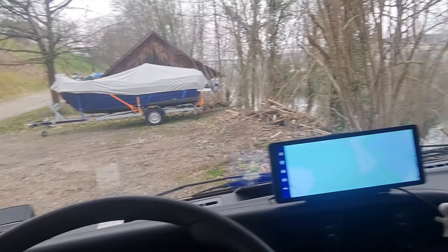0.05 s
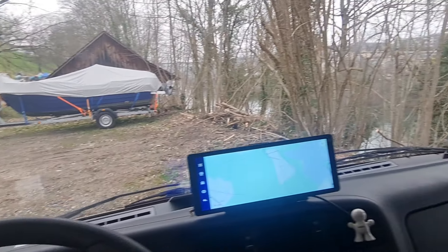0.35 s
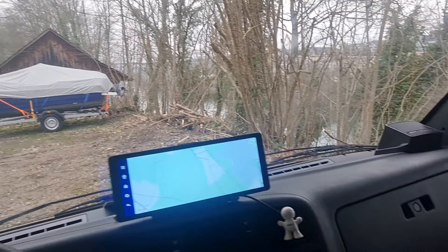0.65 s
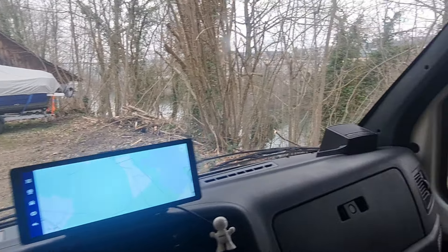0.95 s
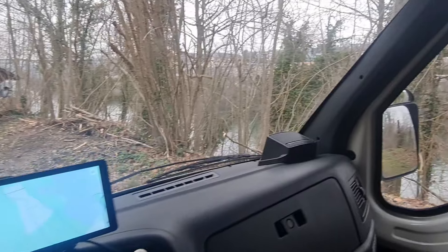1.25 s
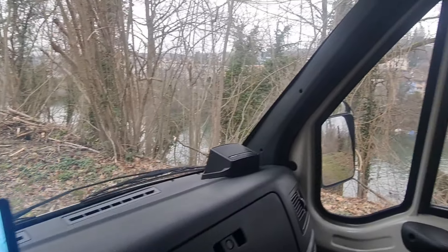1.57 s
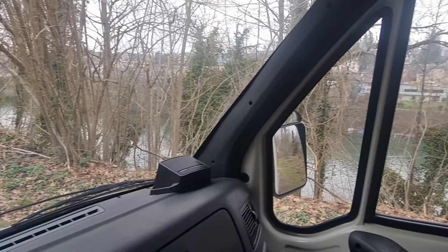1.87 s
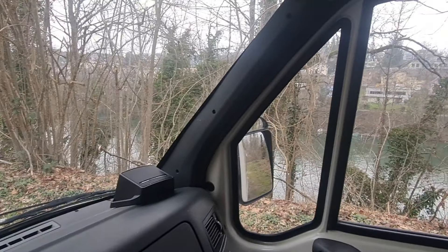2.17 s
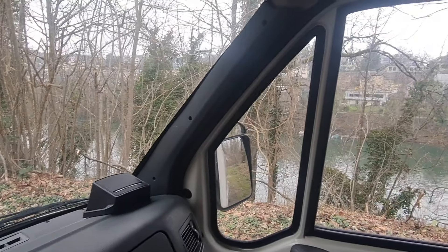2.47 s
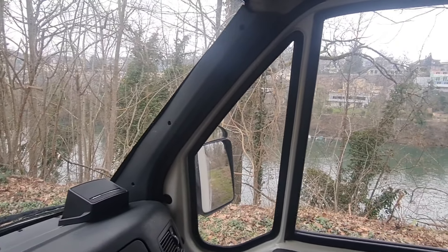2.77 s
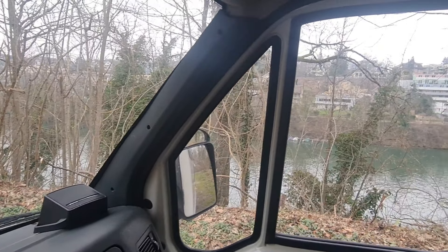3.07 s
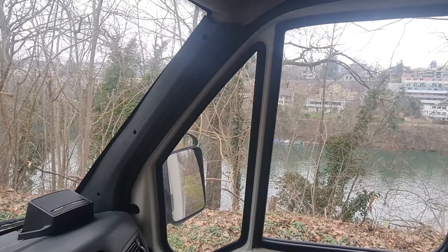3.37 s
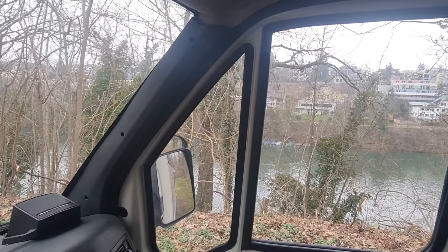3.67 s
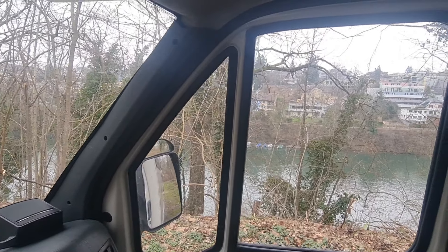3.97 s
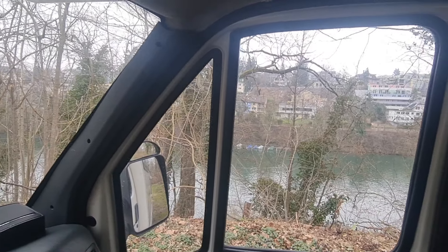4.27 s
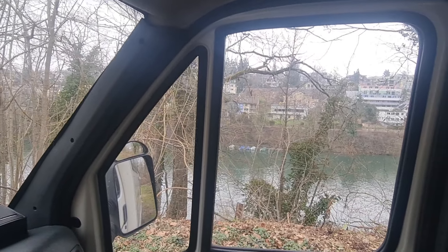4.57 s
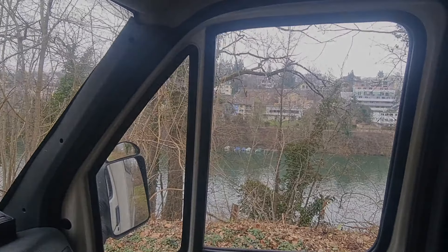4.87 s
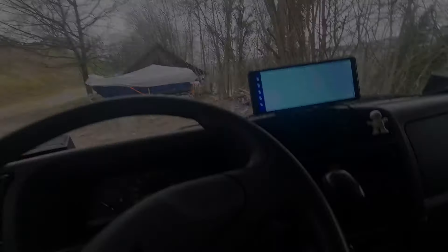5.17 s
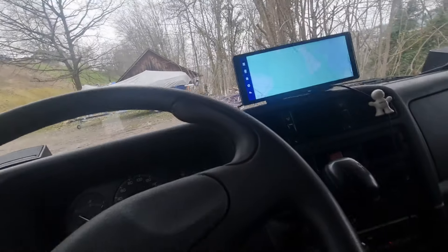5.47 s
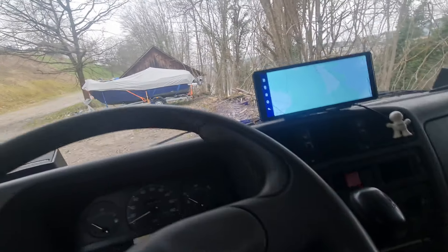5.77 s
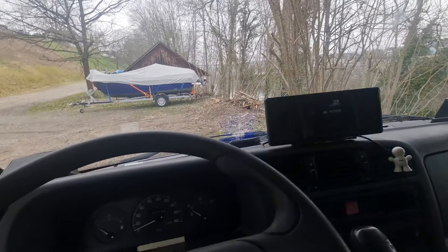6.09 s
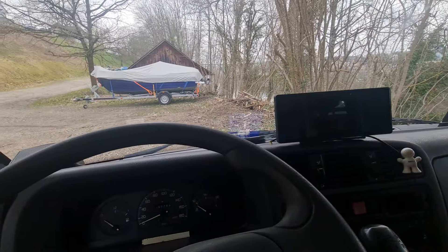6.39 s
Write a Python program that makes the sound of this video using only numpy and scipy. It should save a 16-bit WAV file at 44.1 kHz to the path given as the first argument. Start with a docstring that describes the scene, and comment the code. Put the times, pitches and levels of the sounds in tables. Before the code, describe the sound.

From the driver's seat of a parked van, a diesel engine idles steadily, making the cab boom, knock and rattle. A faint whine and tiny belt chirps run through it, with brief seat creaks and a plastic tick early on. The idle fades out without slowing. In the now quiet cab, a sleeve rustles, the body rumbles softly and keys click, ending with a short scrape and knock in the ignition lock.

```python
"""Idling camper van, then keys

From the driver's seat, a four-cylinder diesel makes the cab boom, knock and rattle with each firing.
Gears whine, a slipping belt chirps, the seat creaks, plastic ticks and a finger brushes the microphone.
The idle fades out at the same speed and the quiet cab fades in: a sleeve rustles, the body rumbles,
keys tick together, and the key scrapes and snaps in the ignition lock, knocking the steering column."""
import sys
import numpy as np
from scipy import signal
from scipy.fft import rfft, irfft, next_fast_len
from scipy.io import wavfile
from scipy.ndimage import uniform_filter1d, map_coordinates

SR = 44100
rng = np.random.default_rng(int(sys.argv[2]) if len(sys.argv) > 2 else 0)


def generate_wav(sig):
    """Save sig (samples, or channels by samples) to the path in sys.argv[1] as 16-bit PCM at SR."""
    pcm = np.round(np.clip(np.atleast_2d(sig).T, -1, 1) * 32767).astype(np.int16)
    wavfile.write(sys.argv[1], SR, pcm)


N = 283563
T = np.arange(N) / SR

FIRING_HZ = 24.62   # a "beat" is the time between two firings; four beats make one engine cycle
TURN_S = 3.3   # the microphone swings from wheel to side window; each "early boost" is gone by then
SILENT_AT_S, FADE_OUT_S, FADE_IN_S = 5.109, 0.52, 0.35

# Tone, colour and ring levels are relative; timed events carry their own loudness.
# how alike the left and right sides are: (frequency [Hz], likeness [0 to 1])
STEREO_LIKENESS = [(60, 0.5), (150, 0.96), (300, 0.7), (600, 0.5), (1200, 0.17), (4000, 0.22), (12000, 0.5)]
# which side is louder: (frequency [Hz], left over right [dB])
STEREO_BALANCE = [(60, -0.5), (150, -1.0), (380, -0.5), (940, -1.5), (2370, -3.5), (5940, -5.0),
                  (14900, -3.5)]
# engine sound reaches the left side first: (frequency [Hz], head start [s])
ENGINE_LEAD = [(250, 0.00042), (550, 0.00027), (1100, 0.000445)]
# tones of the booming cab and its panels: (multiple of the firing rate, level [dB])
BOOM_TONES = [(1, -0.5), (2, -1.73), (3, -9.5), (4, -10.5), (5, -19), (6, -19), (7, -17), (8, -16.5),
              (9, -14), (10, -31), (11, -36), (12, -23), (13, -19), (14, -25.5)]
# ways from the engine into the cab: (highest multiple carried, delay [beats], level [dB],
# early boost [dB], level wobble [dB], phase wobble [rad])
BOOM_PATHS = [(1, 0.065, 0, -2.5, 1.3, .04), (2, 0.0088, 0, 0.5, 1, 0.044),
              (3, 0.0023, -0.5, 3.5, 1, 0.045), (4, 0.082, -1.34, -8, -0.1, 0.078),
              (7, 0.198, -2.5, -6, 3.5, 0.58), (9, -0.0127, -0.42, 0, 1.06, 0.31),
              (14, 0.486, -2, 1.5, 1, 0.096)]
# tone colour of the engine's rumble: (frequency [Hz], level [dB])
RUMBLE_COLOUR = [(20, -26), (40, 16), (80, 10), (115, 16.5), (160, 9.5), (210, 12), (270, 2), (400, -51)]
# ring of the bulkhead, the wall between engine and cab: (pitch [Hz], width [Hz], level [dB])
BULKHEAD_RING = [(290.5, 119, 0)]
# how hard each of the four cylinders thumps that wall: (level [dB])
CYLINDER_THUMPS = [-13.5, 0.5, -3, 0]
# knocks set off by each firing: (lowest frequency [Hz], highest frequency [Hz], start [beats],
# decay [beats], height over the steady din [ratio], share that repeats each cycle [0 to 1], level [dB])
KNOCK_BANDS = [(214.3, 404, 0.52, 0.16, 0.33, 0.55, -3.5), (454, 1185, 0.58, 0.23, 0.51, 0.5, 2),
               (1005, 2340, .53, 0.75, 1.8, 0.5, 0)]
# how hard each cylinder knocks: (level [dB])
CYLINDER_KNOCKS = [-0.5, -1, -1, -1.5]
# clack of each cylinder's fuel injector: (height over the steady din [ratio])
INJECTOR_CLACKS = [0.25, 0.1, 1.1, 1.4]
# tone colour of the clatter that reaches the cab: (frequency [Hz], level [dB])
CLATTER_COLOUR = [(140, -40), (240, -0.5), (263, -0.5), (327, -2), (400, -7), (475, -18), (540, -16),
                  (719, -17.5), (886, -22.5), (1060, -23.5), (1220, -28), (1580, -26.5), (1710, -31),
                  (2600, -41.5), (3380, -67), (5720, -120)]
# gears and alternator: (pitch [Hz], level [dB], early boost [dB], phase wobble [rad], level wobble [dB])
WHINE_TONES = [(592, -22, -4, 0.65, 3.5), (648, -22, -8, 0.7, 2), (716, -26.5, 7, 0.7, 2.5),
               (744, -22.5, 2, 0.7, 4.5), (828, -33, 6, 1.2, 4), (1036, -28, 0, 0.31, 0.5),
               (1334, -30.5, 3, 1.6, 2), (1597, -29.5, -4.5, 1.1, 1.5)]
# valve gear and loose trim rattling through one cycle:
# (start [beats], hold [beats], level [dB], bright edge [dB], early boost [dB])
RATTLE_PATTERN = [(0.04, 0.13, -3.5, -2.5, 0), (0.54, .22, 1, -4, -6), (0.751, .04, -7, 2.5, -5.5),
                  (1.06, .28, 1.5, 3, -2), (1.38, .36, 0.5, -1.5, -3), (1.76, 0.15, 1, 6, -5.5),
                  (2.05, .32, 3, 2, -2.5), (2.41, 0.32, 1, -2.5, -5), (2.78, 0.15, -2, 2.5, -2),
                  (2.96, 0.4, -2.5, -13, -4.5), (3.34, .25, -1.5, -6.5, -3.5), (3.63, 0.41, -1, -4.5, -2)]
# ring of the loose trim: (pitch [Hz], width [Hz], level [dB])
TRIM_RING = [(2950, 250, -1.5), (3630, 150, -2), (3893, 150, 0)]
# tone colour of the rattle: (frequency [Hz], level [dB])
RATTLE_COLOUR = [(1180, -31), (2000, 5), (2100, 2.5), (2640, -5.5), (3670, -5), (4530, -9), (5270, -8),
                 (5880, -15.5), (6680, -14.5), (8380, -21.5), (9050, -39), (10000, -42), (14300, -40.5),
                 (15000, -32.5)]
# slips of the belt: (time [s], level [dB], pitch [Hz])
BELT_CHIRPS = [(.047, -64, 5260), (.2, -68, 5220), (.233, -79, 5570), (0.409, -68, 5280),
               (0.488, -59, 5210), (.518, -64.5, 5180), (.641, -66, 5170), (.691, -61, 5170),
               (.804, -63.5, 5180), (.86, -66, 4950), (.97, -64, 5170), (1.009, -61, 5200),
               (1.13, -62, 5200), (1.182, -61.5, 5320), (1.35, -63, 5300), (1.46, -61, 5050),
               (1.505, -61.5, 5270), (1.622, -61.5, 5170), (1.651, -63, 5300), (1.828, -63, 5340),
               (1.984, -64, 5140), (2.15, -64, 5390), (2.319, -63, 5420), (2.483, -60.5, 5380),
               (2.52, -65, 5120), (2.636, -63.5, 5330), (2.676, -63, 5180), (2.756, -65, 5140),
               (2.8, -65, 5300), (3.29, -65, 5280), (3.459, -60, 5260), (3.813, -65, 5140),
               (3.899, -64, 5220), (4.595, -69, 5300)]
# creaks of the seat: (time [s], level [dB], half length [s], pitch [Hz], rise [Hz/s])
SEAT_CREAKS = [(0.425, -46.5, .014, 485, 500), (0.533, -49.5, 0.017, 620, 6070)]
# plastic ticking in the cab: (time [s], level [dB], left over right [dB], snap over crackle [dB],
# crackle decay [s], bright edge [dB], highest treble over edge [dB])
PLASTIC_TICKS = [(1.087, -29, -9, 16.5, .0004, -1.5, -13), (1.0933, -26, 2, 9, 0.001, -22, -14),
                 (3.58, -41.5, -5.5, 9, 0.0013, 10, -27), (4.351, -39, -3, 2, 0.017, 3.5, -34.5)]
# thin high hiss of a finger brushing the microphone, later the top of the sleeve's rustle:
# (time [s], level [dB], half length [s])
HISS_SWELLS = [(1.147, -85, 0.068), (1.285, -83, 0.019), (1.465, -83, .02), (1.525, -77, 0.025),
               (5.45, -88.5, 0.18), (5.521, -76, .003)]
# tone colour of the van's body rocking: (frequency [Hz], level [dB])
ROCKING_COLOUR = [(15, -37.5), (25, -15), (38, -6.5), (52, -0.5), (64, -8), (80, -12.5), (113, -19),
                  (211, -28.5), (245, -27.5), (280, -23.5), (354, -41), (700, -48), (910, -76),
                  (1540, -120)]
# tone colour of the sleeve and the cab's still air: (frequency [Hz], level [dB])
RUSTLE_COLOUR = [(150, -25), (250, -9), (364, -5.5), (448, -8.5), (513, -8.5), (620, -13), (1270, -14.5),
                 (1560, -19.5), (1890, -20), (2530, -22.5), (4200, -23), (6800, -27), (8500, -35.5),
                 (10500, -42), (15000, -35)]
# moves of the sleeve: (time [s], level [dB], half length [s])
SLEEVE_RUSTLES = [(5.46, -70, 0.15), (6.35, -68, 0.024)]
# bumps on the body and steering column: (time [s], level [dB], pitch [Hz], rise time [s], decay [s])
SOFT_BUMPS = [(5.488, -55, 198, .003, 0.025), (5.499, -41, 51.2, .012, 0.036),
              (5.502, -47.5, 270, .001, 0.0083), (5.517, -69, 400, .001, 0.011),
              (5.532, -58.5, 536, .001, 0.011), (5.635, -48, 53.6, .01, 0.034),
              (5.965, -59, 440, .002, 0.0094), (6.069, -58.5, 285, .002, .015),
              (6.139, -47.5, 50, .01, 0.037), (6.204, -43, 47.7, 0.0055, 0.023),
              (6.287, -52, 440, .012, .022), (6.32, -38, 440, 0.017, 0.019),
              (6.343, -46.5, 310, .002, 0.01), (6.362, -42.5, 55.3, .003, 0.019),
              (6.366, -36, 492, .006, 0.0075), (6.38, -47, 480, .002, 0.0072),
              (6.404, -61, 416, .002, 0.011)]
# clicks of keys and lock: (time [s], level [dB], left over right [dB], treble [dB])
KEY_CLICKS = [(5.519, -72, 3, -1), (5.943, -61.5, -2, -6.5), (5.959, -66, 2, -18), (6.044, -75, -3, 3),
              (6.069, -60.5, 3, -3.5), (6.239, -75, -2, -10), (6.3268, -50, -6, -8), (6.3323, -58, 0, -12),
              (6.351, -62, -3, -18), (6.381, -70, 2, -14)]
# ring of the keys and lock: (pitch [Hz], width [Hz], level [dB])
KEY_RING = [(1100, 130, -1), (1530, 120, -4), (1930, 79, -8), (2430, 140, -3), (3140, 320, -8),
            (4130, 230, 0.5), (5400, 500, -8), (6240, 240, 9), (6800, 610, 0), (8600, 420, -5),
            (12800, 540, -21)]
# the key squeaking on the face of the lock: (time [s], level [dB], pitch [Hz])
KEY_SQUEAKS = [(5.969, -75, 2514), (6.25, -78, 2280)]
# the key dragging through the lock: (time of full pressure [s], level [dB], rise time [s])
KEY_PUSHES = [(6.335, -50.5, 0.087), (6.429, -52, 0.0091)]
# ring of the steering column's cover: (pitch [Hz], width [Hz], level [dB])
COLUMN_RING = [(295, 97, -3.5), (450, 46, 6), (492, 45, 2.5), (660, 110, -12), (790, 120, -12),
               (1150, 82, -18.5), (1440, 120, -20.5), (1900, 410, -25.5), (2500, 310, -24.5),
               (3570, 1600, -38)]


def from_db(db):
    """Turn decibels into a number to multiply by."""
    return 10 ** (np.asarray(db) / 20)


def rms_one(x):
    """Scale a sound so that its average strength (rms) is 1."""
    return x / np.sqrt(np.mean(x ** 2) + 1e-30)


def at_hz(points, hz):
    """Read between the rows of a table, spacing frequencies by octaves."""
    f, value = np.transpose(points)
    return np.interp(np.log(hz + 1), np.log(f + 1), value)


def drift(rate):
    """A smooth random wobble of size about 1, with `rate` new values a second."""
    coarse = T[::16]
    wobble = map_coordinates(rng.standard_normal(2048), [coarse * rate], order=3, mode="wrap")
    return np.interp(T, coarse, wobble)


def ramp(zero_s, full_s):
    """A straight slope from 0 at one time to 1 at another, which may be earlier."""
    return np.clip((T - zero_s) / (full_s - zero_s), 0, 1)


def swells(rows):
    """Add up bell-shaped rises and falls in loudness."""
    return sum(from_db(db) * np.exp(-((T - s) / length) ** 2 / 2) for s, db, length in rows)


def band(x, low_hz, high_hz):
    """Keep mainly the sound between two frequencies."""
    return signal.sosfilt(signal.butter(2, [low_hz, high_hz], "band", fs=SR, output="sos"), x + 1e-18)


def resonate(x, modes):
    """Let a sound ring an object at its own pitches, every second one with its sign flipped."""
    out = 0
    for k, (hz, width, db) in enumerate(modes):
        r = np.exp(-np.pi * width / SR)
        ring = signal.lfilter([1, 0, -1], [1, -2 * r * np.cos(2 * np.pi * hz / SR), r * r], x + 1e-18)
        out = out + (-1) ** k * from_db(db) * (1 - r * r) / 2 * ring
    return out


def pan(db):
    """Left and right gains that make the left side `db` louder."""
    return from_db(np.array([[db], [-db]]) / 2)


def stereo(pair, colour, lead=((1, 0),)):
    """Colour two unrelated noises and blend them into left and right, most alike in the bass; rms 1."""
    size = next_fast_len(N, real=True)
    hz = np.arange(size // 2 + 1) * SR / size
    mid, side = rfft(pair, size) * from_db(at_hz(colour, hz))
    alike = at_hz(STEREO_LIKENESS, hz)
    mid, side = mid * np.sqrt(1 + alike), side * np.sqrt(1 - alike)
    tilt = from_db(at_hz(STEREO_BALANCE, hz) / 2)
    delay = np.exp(-2j * np.pi * hz * at_hz(lead, hz))
    return rms_one(irfft([(mid + side) * tilt, (mid - side) / tilt * delay], size)[:, :N])


def in_cab(x, echo_s, echo_db):
    """Add quick echoes off glass and trim, which fall by 60 dB in `echo_s`."""
    t = T[:SR // 4]
    tail = band(rng.standard_normal((2, len(t))), 150, 5200) * from_db(-60 * t / echo_s) * (t > .0015)
    tail /= np.sqrt(np.sum(tail ** 2, axis=1, keepdims=True))
    return x + from_db(echo_db) * signal.fftconvolve(np.atleast_2d(x), tail, axes=1)[:, :N]


def boom(level_db=-24.5):
    """Each firing pushes the air and shakes the panels, reaching the cab by paths with their own delays."""
    out, early = 0, ramp(TURN_S, 0)
    for multiple, db in BOOM_TONES:
        path = next(row for row in BOOM_PATHS if round(row[0]) >= multiple)
        _, delay, path_db, early_db, wobble_db, wobble_rad = path
        angle = 2 * np.pi * multiple * (FIRING_HZ * T - delay) + wobble_rad * drift(6.5)
        out = out + from_db(db + path_db + early_db * early + wobble_db * drift(7.9)) * np.cos(angle)
    return from_db(level_db) * rms_one(out) * pan(-.8)


def rumble(level_db=-38.5, wobble_db=0.75, depth=0.21, peak_beats=0.55):
    """The engine's low noise swells once with every firing."""
    gain = from_db(level_db + wobble_db * drift(15))
    chug = 1 + depth * np.cos(2 * np.pi * (FIRING_HZ * T - peak_beats))
    return gain * stereo(rng.standard_normal((2, N)) * chug, RUMBLE_COLOUR, ENGINE_LEAD)


def clatter(uneven_db=2.5, wobble_db=0.65, jitter_s=0.00011, injector_early_db=-7):
    """Each firing sets off knocks and an injector clack; part of the noise repeats with every cycle."""
    beats = FIRING_HZ * (T + jitter_s * drift(10)) + 4
    cycle_size = int(4 * SR / FIRING_HZ)
    place_in_cycle = (beats / 4 % 1 * cycle_size).astype(int)
    cylinder, age = np.divmod((beats - 0.87) % 4, 1)   # the injector clacks late in the beat
    clack = np.array(INJECTOR_CLACKS)[cylinder.astype(int)] * np.exp(-age / 0.1)
    clack *= from_db(injector_early_db * ramp(TURN_S, 0))
    out = 0
    for k, (low, high, start, decay, height, repeats, db) in enumerate(KNOCK_BANDS):
        firing, age = np.divmod(beats - start, 1)
        firing = firing.astype(int)
        luck = rng.standard_normal(256)[firing]
        strength = from_db(np.array(CYLINDER_KNOCKS)[firing % 4] + uneven_db * luck)
        blows = 1 + height * strength * np.exp(-age / decay) + clack * (k > 0)   # no clack in the low band
        repeating = np.sqrt(repeats) * rng.standard_normal((2, cycle_size))[:, place_in_cycle]
        fresh = np.sqrt(1 - repeats) * rng.standard_normal((2, N))
        knocks = band((repeating + fresh) * rms_one(blows), low, high)
        out = out + from_db(db + wobble_db * drift(8)) * knocks
    return stereo(out, CLATTER_COLOUR, ENGINE_LEAD)


def whine():
    """Gears and alternator sing faint, wavering tones whose balance shifts as the microphone turns."""
    out, early = 0, ramp(TURN_S, 0)
    for hz, db, early_db, wobble_rad, wobble_db in WHINE_TONES:
        gain = from_db(db + early_db * early + wobble_db * np.tanh(drift(11)))
        angle = 2 * np.pi * hz * T + wobble_rad * drift(20) + rng.uniform(0, np.pi / 2, (2, 1))
        out = out + gain * np.sin(angle)
    return np.sqrt(2) * out


def thumps(level_db=-45.5, early_db=-4, start_beats=0.52, uneven_db=2.5, jitter_s=0.00032):
    """The four cylinders thump the bulkhead unequally, and no two beats are quite alike."""
    firings = np.arange(int(SILENT_AT_S * FIRING_HZ))
    luck = rng.standard_normal((len(firings), 2))
    times = (firings + start_beats) / FIRING_HZ + jitter_s * luck[:, 0]
    strengths = from_db(np.resize(CYLINDER_THUMPS, len(firings)) + uneven_db * luck[:, 1])
    pushes = np.zeros(N)
    pushes[(times * SR).astype(int)] = strengths
    wall = band(resonate(pushes, BULKHEAD_RING), 170, 388)
    return from_db(level_db + early_db * ramp(TURN_S, 0)) * rms_one(wall)


def rattles(level_db=-60.5, rise_beats=0.03, decay_beats=0.065, uneven_db=0.6, grain_db=1.5):
    """Valve gear and loose trim rattle in a limping pattern that returns with every engine cycle."""
    body_power, edge_power = from_db(-7) ** 2, from_db(-4) ** 2   # steady din under the bursts
    early = ramp(TURN_S, 0)
    for start, hold, db, edge_db, early_db in RATTLE_PATTERN:
        cycle, age = np.divmod(FIRING_HZ * T - start, 4)
        luck = rng.standard_normal(64)[cycle.astype(int)]
        burst = np.minimum(age / rise_beats, 1) * np.exp(-np.maximum(age - hold, 0) / decay_beats)
        burst *= from_db(early_db * early + uneven_db * luck)
        body_power += (from_db(db) * burst) ** 2
        edge_power += (from_db(edge_db) * burst) ** 2
    contacts = rng.standard_normal((2, 2, N)) * from_db(grain_db * drift(300))
    trim = resonate(rng.standard_normal((2, N)) * np.sqrt(body_power), TRIM_RING)
    metal = band(contacts[0] * np.sqrt(body_power), 2310, 6000)
    edge = from_db(-2) * band(contacts[1] * np.sqrt(edge_power), 5700, 8300)
    return from_db(level_db) * stereo(trim + metal + edge, RATTLE_COLOUR, ENGINE_LEAD)


def belt(gain_db=-3, half_length_s=.0105, fall_hz_per_s=5000, flutter_db=3.5):
    """Each slip of the belt makes a short, hoarse chirp that falls in pitch."""
    out, roughness_hz = np.zeros(N), 160 * drift(900)
    for s, db, centre_hz in BELT_CHIRPS:
        near = slice(max(int((s - .05) * SR), 0), int((s + .05) * SR))
        age = T[near] - s
        hz = centre_hz - fall_hz_per_s * age + roughness_hz[near]
        swell = from_db(db + gain_db) * np.exp(-(age / half_length_s) ** 2 / 2)
        out[near] += swell * np.sin(2 * np.pi * np.cumsum(hz) / SR)
    return in_cab(out * from_db(flutter_db * drift(200)), echo_s=0.1, echo_db=-6) * pan(-8)


def engine(clatter_db=-42):
    """All the sounds of the diesel at a steady idle."""
    return boom() + rumble() + from_db(clatter_db) * (clatter() + whine()) + thumps() + rattles() + belt()


def seat_creaks(wobble_rad=0.53):
    """The seat gives short, rising creaks under the turning driver."""
    out = 0
    for s, db, length, hz, rise in SEAT_CREAKS:
        age = T - s
        angle = 2 * np.pi * (hz + rise * age / 2) * age + wobble_rad * drift(120)
        out = out + swells([(s, db, length)]) * np.sin(angle)
    return in_cab(out, echo_s=0.07, echo_db=-13)


def plastic_ticks(gain_db=-12, shell_db=7):
    """Plastic parts give way with a snap and a dry crackle that briefly ring the dashboard's shell."""
    out, age = np.zeros((2, N)), T[:SR // 30]
    for s, db, pan_db, snap_db, decay_s, edge_db, top_db in PLASTIC_TICKS:
        crackle = rng.standard_normal((2, len(age))) * np.exp(-age / decay_s)
        crack = crackle + from_db(snap_db) * (age == 0)
        shell = resonate(crack, [(790, 200, 2), (1150, 400, 2), (1620, 480, 3), (3200, 2200, -13)])
        edge = band(band(crack, 700, 6500), 700, 6500) + from_db(top_db) * band(crack, 5000, 15000)
        tick = from_db(shell_db) * shell + from_db(edge_db) * edge
        at = int(s * SR)
        out[:, at:at + len(age)] += from_db(db + gain_db) * tick * pan(pan_db)
    return in_cab(out, echo_s=0.14, echo_db=-7.5)


def high_hiss(floor_db=-100, grain_db=1.5):
    """Over the microphone's own thin hiss, a finger brushes it; later comes the sleeve's top treble."""
    rubbing = swells(HISS_SWELLS) * from_db(grain_db * drift(300))
    return (from_db(floor_db) + rubbing) * rms_one(band(rng.standard_normal(N), 10500, 15500))


def body_rocking(level_db=-58.5, wobble_db=2.5):
    """The van's body rocks with a soft, low rumble."""
    noise = stereo(rng.standard_normal((2, N)), ROCKING_COLOUR)
    noise /= np.sqrt(uniform_filter1d(np.mean(noise ** 2, axis=0), size=SR // 20))   # even out the level
    return from_db(level_db + wobble_db * drift(24)) * noise


def sleeve(air_db=-76.5, grain_db=1.0):
    """A sleeve rustles: grainy noise swells above the faint hush of the cab's air."""
    noise = rng.standard_normal((2, N)) * from_db(grain_db * drift(330))
    return (from_db(air_db) + swells(SLEEVE_RUSTLES)) * stereo(noise, RUSTLE_COLOUR)


def bumps():
    """Each soft bump on the body or steering column rings one low note that dies quickly."""
    out = 0
    for s, db, hz, rise_s, decay_s in SOFT_BUMPS:
        age = np.maximum(T - s, 0)
        loudness = from_db(db) * (1 - np.exp(-age / rise_s)) * np.exp(-age / decay_s)
        out = out + loudness * np.sin(2 * np.pi * hz * age)
    return out * pan(-1.3)


def keys(gain_db=-10, chatter_s=0.0055, crack_db=-12, bright_db=3):
    """Each click is a quick chatter of metal on metal: a dry crack and the ring of the keys."""
    out, age = np.zeros((2, N)), T[:SR // 8]
    for s, db, pan_db, treble_db in KEY_CLICKS:
        contacts = rng.choice([-1, 1], len(age)) * (rng.random(len(age)) < .15) * np.exp(-age / chatter_s)
        click = resonate(contacts, KEY_RING) + from_db(crack_db) * band(contacts, 1800, 12400)
        click = band(click, 700, 4700) + from_db(treble_db + bright_db) * band(click, 2900, 18000)
        click *= from_db(db + gain_db) / np.std(click[age < chatter_s])
        at = int(s * SR)
        out[:, at:at + len(age)] += click[:N - at] * pan(pan_db)
    return in_cab(out, echo_s=0.07, echo_db=0.5)


def key_squeaks(wobble_rad=.5, half_length_s=0.006):
    """The key slides on the face of the lock for a moment and sings one thin note."""
    out = sum(swells([(s, db, half_length_s)]) * np.sin(2 * np.pi * hz * T + wobble_rad * drift(200))
              for s, db, hz in KEY_SQUEAKS)
    return in_cab(out, echo_s=0.068, echo_db=-10)


def lock_scrape(slips_per_s=2500, hold_s=0.024, release_s=0.087):
    """The key rubs over the lock's pins in many tiny slips that ring the steering column's cover."""
    slips = rng.standard_normal(N) * (rng.random(N) < slips_per_s / SR)
    scrape = in_cab(resonate(slips, COLUMN_RING), echo_s=0.018, echo_db=-8)
    scrape /= np.sqrt(uniform_filter1d(np.mean(scrape ** 2, axis=0), size=SR // 60) + 1e-12)
    pressure = 0
    for s, db, rise_s in KEY_PUSHES:
        push = ramp(s - rise_s, s) * ramp(s + hold_s + release_s, s + hold_s)   # swell, hold, fade
        pressure = pressure + from_db(db) * push ** 2
    return pressure * scrape * pan(-1.8)


def scene():
    """The idle fades to silence, then the small sounds of the quiet cab fade in."""
    fade_out = ramp(SILENT_AT_S, SILENT_AT_S - FADE_OUT_S)
    fade_in = ramp(SILENT_AT_S, SILENT_AT_S + FADE_IN_S)
    idling = engine() + seat_creaks() + plastic_ticks()
    quiet_cab = body_rocking() + sleeve() + bumps() + keys() + key_squeaks() + lock_scrape()
    return fade_out * idling + fade_in * quiet_cab + (fade_out + fade_in) * high_hiss()


def record(dry):
    """Cut the highest treble steeply: 70 dB down from 16300 Hz up."""
    return signal.sosfilt(signal.cheby2(14, 70, 16300, fs=SR, output="sos"), dry)


dry = scene()
out = record(dry)
generate_wav(out)
```